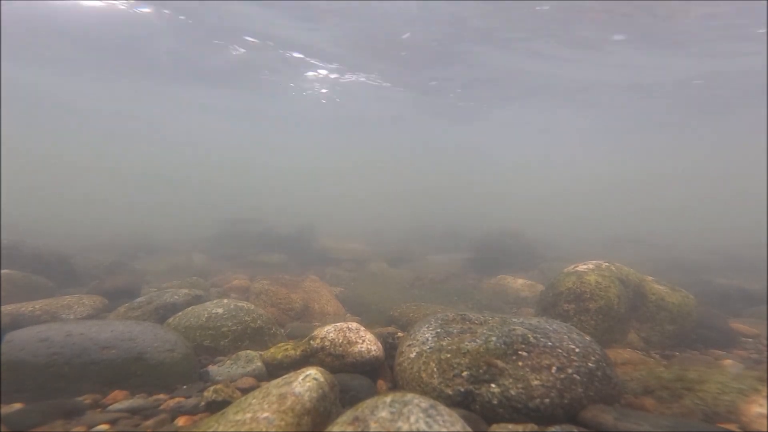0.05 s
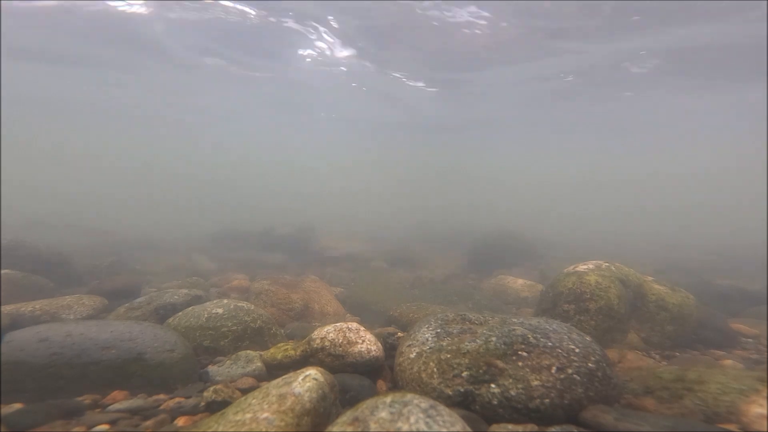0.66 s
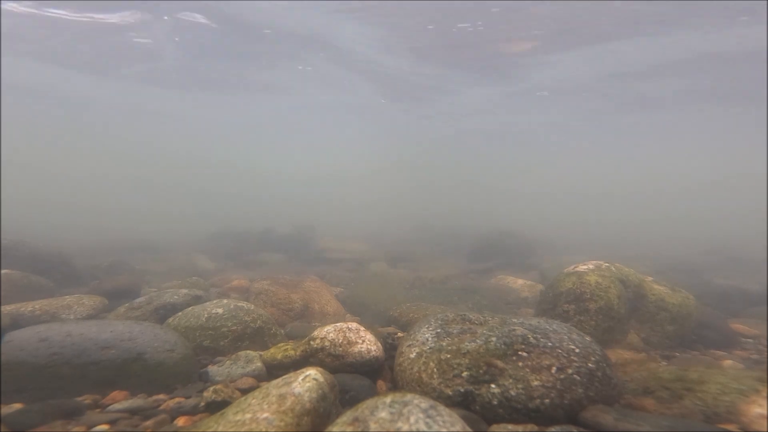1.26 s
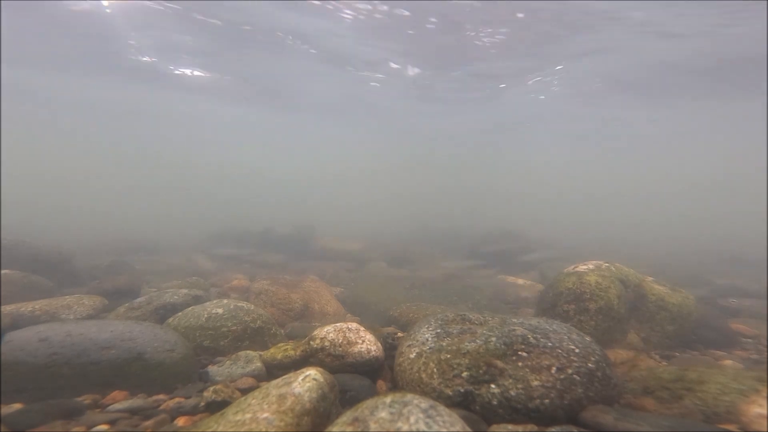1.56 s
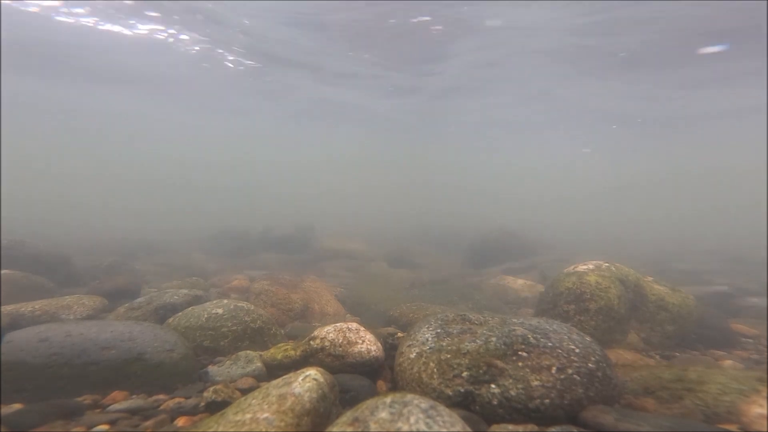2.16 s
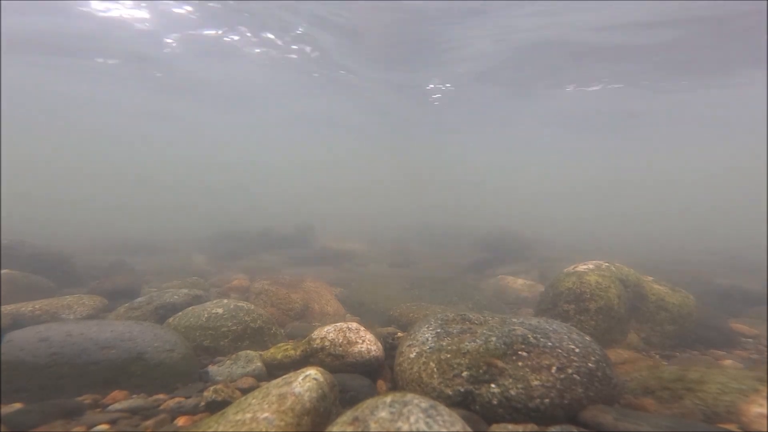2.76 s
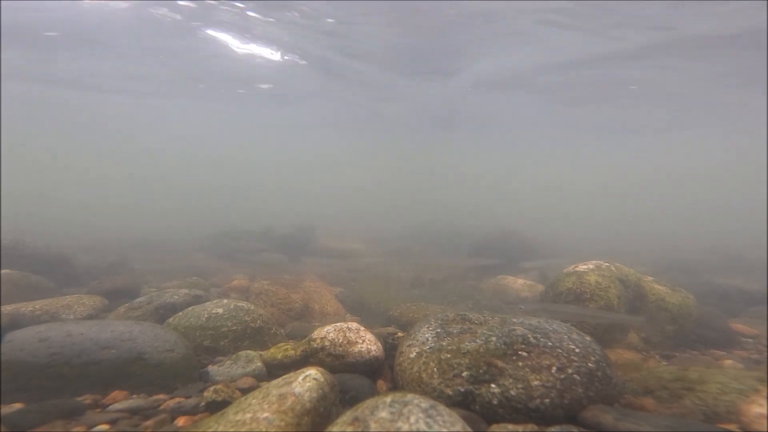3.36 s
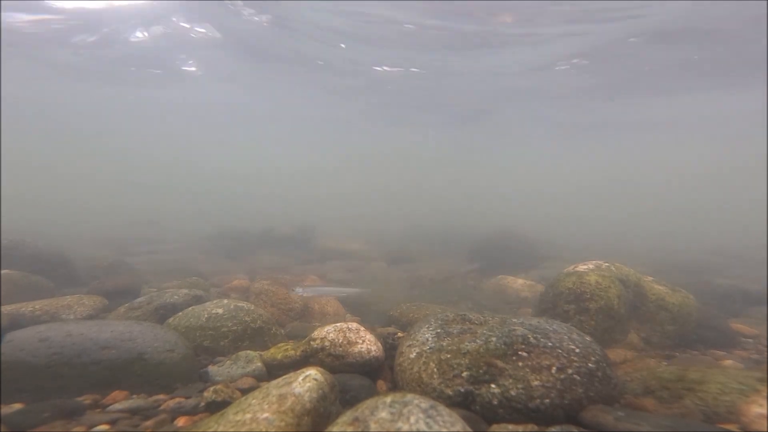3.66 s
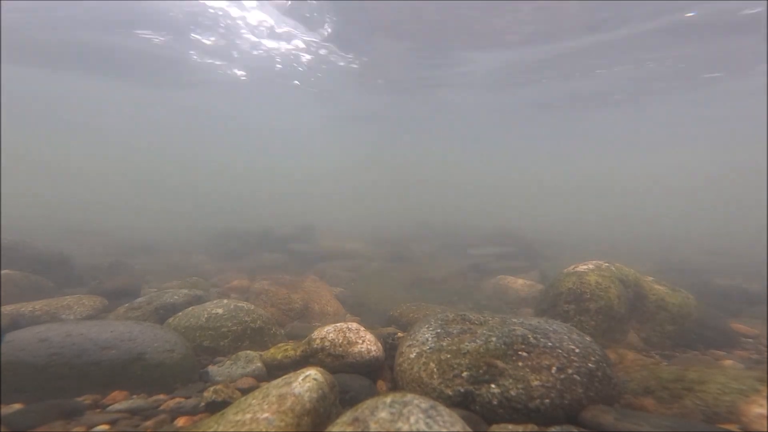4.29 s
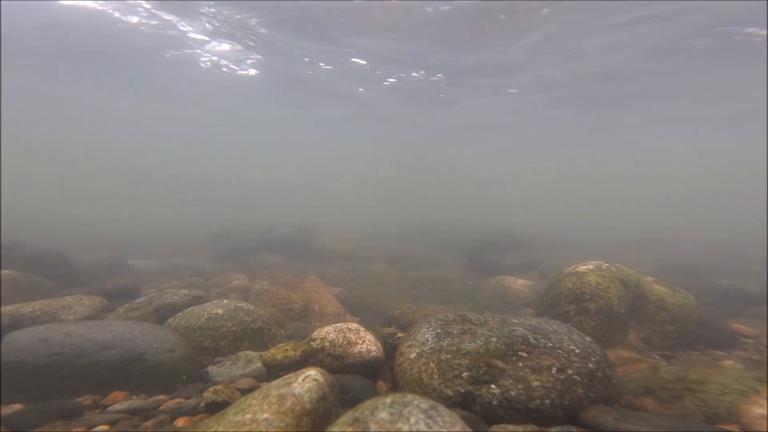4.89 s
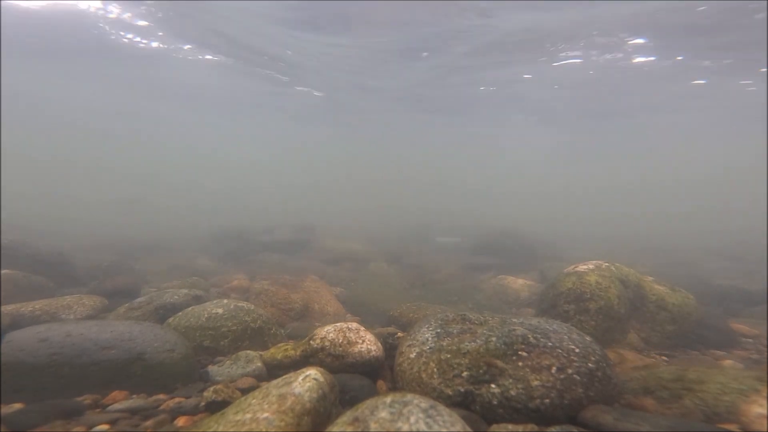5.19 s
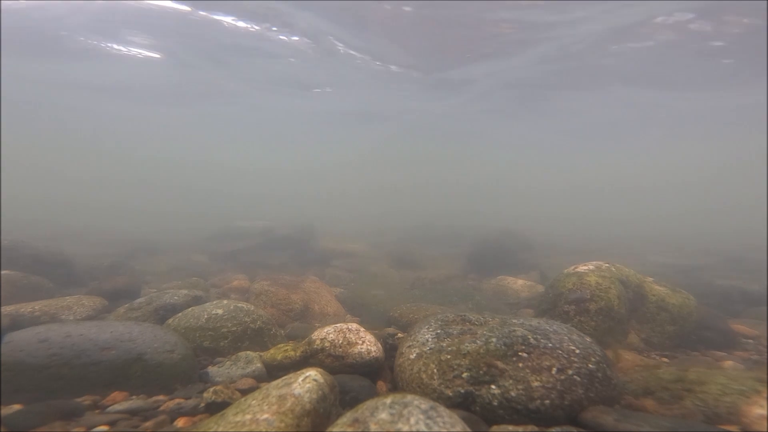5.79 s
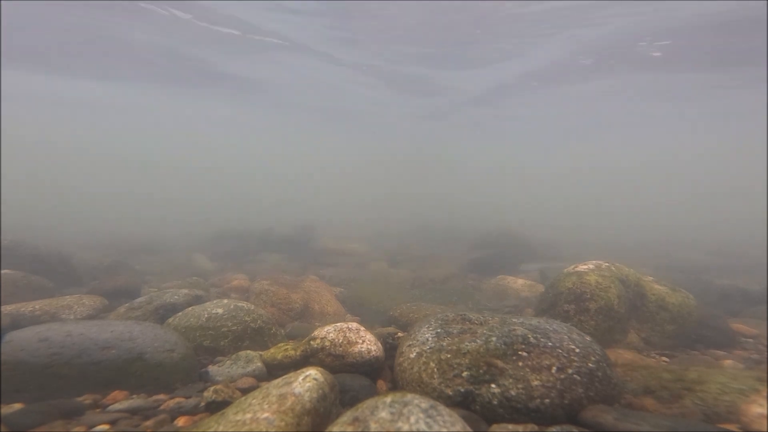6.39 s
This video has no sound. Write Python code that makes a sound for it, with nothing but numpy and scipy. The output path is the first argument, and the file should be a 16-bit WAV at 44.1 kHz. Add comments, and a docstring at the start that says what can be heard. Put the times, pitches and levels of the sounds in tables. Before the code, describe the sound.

A shallow, choppy river is heard through a microphone in a waterproof case resting among the stones. Small bubbles plop and tick in uneven spurts, and water knocks hollowly on the case over a steady low rumble. The bubbling is busiest in the first second and a half, eases in the middle, then returns with sharp plops just after four seconds and again near five.

```python
"""Choppy river from the riverbed

A shallow river heard from a waterproof camera case resting among the stones. Ripples fold air under,
and every bubble rings briefly at its own pitch. Slaps and ticks ring the case, eddies shake it into
a low rumble, and two microphones inside hear it through different paths."""
import sys
import numpy as np
from scipy import signal
from scipy.fft import rfft, irfft
from scipy.io import wavfile
from scipy.ndimage import uniform_filter1d

SR = 44100
rng = np.random.default_rng(int(sys.argv[2]) if len(sys.argv) > 2 else 0)


def wav_out(sig):
    """Save sig, one row per channel (or a flat mono array), as 16-bit PCM at SR to the path in sys.argv[1]."""
    wavfile.write(sys.argv[1], SR, np.round(np.clip(np.atleast_2d(sig).T, -1, 1) * 32767).astype(np.int16))


N = 284004

# Level rides. Each row: time in seconds, relative level in dB.
BUBBLING_RIDE = [(0.0, -58), (0.14, -57), (0.54, -54.5), (1.12, -53), (1.28, -59.5), (1.6, -52),
                 (2.01, -61), (2.3, -60.5), (2.48, -54), (2.71, -64), (3.43, -61), (3.68, -59), (4.24, -59),
                 (4.33, -55), (4.478, -61), (4.92, -55.5), (5.401, -60), (6.03, -60), (6.44, -64.5)]  # air folded under by ripples
SPRAY_RIDE = [(0.0, -69.5), (0.86, -69.5), (1.07, -62.5), (1.2, -71), (2.39, -73.5), (3.1, -78),
              (4.05, -65), (4.41, -77), (4.79, -66), (5.27, -72.5), (5.7, -69), (6.44, -78.5)]  # fine spray on the surface
CHURN_RIDE = [(0.0, -58), (0.14, -66.5), (0.54, -41.5), (0.72, -55), (1.33, -57.5), (1.58, -45.5),
              (1.81, -66), (2.06, -63), (2.55, -52.5), (3.05, -57), (3.28, -68.5), (4.16, -55.5),
              (4.27, -46), (4.54, -60.5), (4.98, -52.5), (5.35, -62), (5.8, -71.5), (6.06, -61),
              (6.44, -59)]  # water churning at the case
EDDY_RIDE = [(0.0, -48), (0.12, -61.5), (0.57, -39.5), (0.73, -49), (1.45, -47), (1.5, -68), (1.68, -38.5),
             (1.96, -63), (2.1, -39.5), (2.17, -59), (2.24, -43.5), (2.33, -60), (2.76, -43), (2.8, -52.5),
             (3.78, -59), (3.96, -46), (4.7, -61.5), (5.16, -49.5), (5.31, -64), (5.49, -45), (5.81, -65),
             (6.44, -42.5)]  # eddies of the current

# Tone curves. Each row: frequency in Hz, relative gain in dB.
BUBBLE_EQ = [(800, 0), (1100, -4.5), (1600, -1.5), (2250, 9.5), (2900, 0), (3800, 10), (4800, 9.5),
             (5800, -8.5)]  # small bubbles through the case
PING_EQ = [(6400, -4), (8000, 5.5), (9500, -0.5), (11000, -10.5), (13500, -11)]  # pings of spray
CRACKLE_EQ = [(300, 2.5), (1100, 0.5), (1650, -3), (2300, 0), (3200, -7.5), (4600, 3), (6200, -3),
              (8000, -5), (10500, -24), (15000, -21)]  # bursting foam
GULP_EQ = [(270, -6), (330, -14), (400, 7.5), (490, -28), (600, 4.5), (700, -46)]  # small gulps through the case
WASH_EQ = [(100, -22), (180, -5), (265, 14), (500, -14), (750, -13), (1100, 0), (1600, -21), (2250, 3.5),
           (3000, -10.5), (4600, -2), (6300, -38), (15000, -59)]  # wash of the far river
DISTANT_EQ = [(500, 1), (1700, -9.5), (4800, -4.5), (7000, -13), (15000, -25.5)]  # the most distant bubbling

# The loudest close bubbles. Each row: start in seconds, pitch in Hz, level in dB.
NEAR_BUBBLES = [(0.0767, 11500, -29), (0.079, 4170, -25), (0.1134, 2154, -15.5), (0.162, 3680, -15),
                (0.2499, 8500, -21), (0.286, 5550, -32), (0.343, 3850, -32), (0.3636, 2630, -27.5),
                (0.3773, 2190, -21), (0.4267, 2090, -8), (0.478, 1400, -19), (0.515, 2310, -23.5),
                (0.6507, 2350, -27.5), (0.832, 4550, -33.5), (0.9855, 2130, -17), (1.0258, 2590, -21),
                (1.044, 7900, -23), (1.0481, 1950, -15), (1.0846, 3970, -27.5), (1.123, 2850, -25),
                (1.1375, 2550, -22.5), (1.341, 2670, -24), (1.361, 3630, -35.5), (1.4097, 4520, -18.5),
                (1.55, 7730, -30), (1.564, 2326, -29), (1.6279, 2310, -30), (1.6828, 3100, -28.5),
                (2.2901, 4060, -29), (2.5085, 2546, -23), (2.537, 2334, -30.5), (2.553, 3620, -31),
                (2.6838, 3510, -30), (2.792, 2230, -29), (3.019, 1377, -32), (3.142, 2016, -35),
                (3.2236, 3660, -34.5), (3.3434, 2200, -36.5), (3.696, 3850, -35), (3.8988, 3360, -30),
                (4.1569, 4630, -12), (4.2753, 2670, -18.5), (4.2812, 2464, -9), (4.2995, 2094, -16),
                (4.313, 2700, -32), (4.3333, 2380, -25), (4.7587, 7980, -24), (4.894, 2276, -13.5),
                (4.93, 2330, -29.5), (5.302, 2260, -34), (5.317, 4450, -35.5), (5.983, 4200, -31.5),
                (6.0426, 4500, -29.5)]
# Water slapping the case. Each row: start in seconds, relative level in dB, pitch in Hz,
# cycles to fade by about 33 dB.
SLAP_HITS = [(0.11, -32.5, 378, 20.5), (0.112, -26, 1130, 12.5), (0.4243, -25, 420, 10),
             (0.4737, -18, 537, 10.9), (0.5445, -22.5, 540, 8.1), (0.832, -40, 613, 29),
             (1.027, -34.5, 290, 7.2), (1.408, -32.5, 290, 7.6), (1.448, -38, 600, 33),
             (1.494, -35.5, 587, 17), (2.031, -29, 268, 14.7), (2.046, -43, 385, 22),
             (2.374, -34.5, 566, 15.5), (2.406, -37, 610, 24), (2.535, -35.5, 587, 17),
             (2.594, -35, 560, 12.2), (2.633, -34.5, 578, 15), (3.047, -39, 466, 11.3),
             (3.249, -36, 567, 18), (3.271, -32, 600, 22), (4.029, -30.5, 700, 11.6),
             (4.28, -30.5, 1150, 11), (5.4745, -38, 393, 23), (5.477, -31.5, 271, 15.4),
             (5.723, -39, 607, 16), (5.83, -37.5, 600, 17)]
# Air pockets snapping shut at the case. Each row: start in seconds, relative level in dB, pitch in Hz.
SNAP_HITS = [(0.1142, -9.5, 1570), (0.4278, -27, 2400), (0.4745, -29, 1070), (0.5455, -34, 940),
             (1.0275, -19, 2300), (2.431, -28, 4130), (3.058, -37.5, 920), (4.03, -49, 1080),
             (4.153, -24, 2200), (4.1567, -12.5, 2170), (4.2814, -15, 1400), (4.9032, -11, 1330)]
# Rising bubbles. Each row: start in seconds, mid-glide pitch in Hz, level in dB.
RISING_BUBBLES = [(0.555, 982, -39), (0.585, 2220, -36), (2.698, 1040, -41), (4.396, 1047, -38.5),
                  (4.989, 2200, -29.5)]
# Splashes that drag air under. Each row: start in seconds, level in dB.
SPLASH_CLOUDS = [(1.03, -43.5), (1.59, -43), (4.29, -36.5), (4.89, -44.5)]

# Resonances. Each row: pitch in Hz, seconds to fade by 60 dB, relative level in dB.
CASE_MODES = [(264.5, 0.41, -10.5), (311, 0.16, -16.5), (398.7, 0.13, -8.5), (507, 0.018, 5),
              (600, 0.05, 2), (1063, 0.052, -9.5), (1150, 0.012, 11), (1400, 0.15, -7)]  # the body of the case
PANEL_MODES = [(2200, 0.046, -5.5), (2455, 0.18, -6.5), (2723, 0.075, -4)]  # its thin panels
# Paths to the two microphones. Each row: frequency in Hz, left minus right in dB, left lead in radians.
MIC_PATHS = [(600, 0.8, -0.0), (1000, 1.2, -0.5), (1200, -3.6, -1.1), (1380, -5.7, -3.1), (1900, 1.4, -3.0),
             (2100, -4.1, -3.5), (2350, -3.3, -5.5), (3000, -0.4, -5.6), (3400, -4.9, -7.1),
             (4200, -7.2, -6.8), (4800, 2.4, -5.6), (5700, -5.1, -5.4), (6400, 1.5, -4.6),
             (8200, -16.1, -13.4), (9800, -0.0, -19.8), (13000, -10.7, -19.8)]


def undb(db):
    """Decibels to gain."""
    return 10 ** (np.asarray(db) / 20)


def unit(x):
    """Scale to rms 1."""
    return x / np.sqrt(np.mean(x ** 2))


def on_log(hz, table, column=1):
    """Read a table column on a log-frequency axis."""
    table = np.array(table)
    return np.interp(np.log(np.maximum(hz, 1)), np.log(table[:, 0]), table[:, column])


def eq(x, curve):
    """Shape the tone with (Hz, dB) points."""
    return irfft(rfft(x) * undb(on_log(np.fft.rfftfreq(N, 1 / SR), curve)), N)


def wander(per_s):
    """Smooth random movement with rms 1."""
    hold = max(int(SR / per_s), 2)
    steps = np.repeat(rng.standard_normal(N // hold + 1), hold)
    return unit(uniform_filter1d(steps, hold)[:N])


def add(track, start_s, sound):
    """Drop a sound onto a track."""
    i = int(np.clip(start_s * SR, 0, N - 1))
    track[i:i + len(sound)] += sound[:N - i]


def ring(hz, t60, sag=0., sag_s=0.0025, rise_cycles=.35):
    """A damped tone that glides down through hz, by the share sag in all; negative sag climbs."""
    t = np.arange(int(np.clip(t60, .002, .4) * SR)) / SR
    pitch = hz * (1 + sag * (np.exp(-t / sag_s) - .5))
    attack = (1 - np.exp(-t * hz / rise_cycles)) ** 2
    return np.sin(2 * np.pi * np.cumsum(pitch) / SR) * np.exp(-np.log(1000) * t / t60) * attack


def flutter():
    """Turbulence deforms ringing bubbles: a fast, uneven gain with rms 1."""
    return unit(undb(1.8 * wander(per_s=650)))


def swarm(spurts, per_s, band_hz, cycles, spread, curve, sag, rise_s, soften):
    """Random bubbles born in spurts, each with a click; soften tames the loudest. Rms 1."""
    out = np.zeros(N)
    low_hz, high_hz = band_hz
    born = np.cumsum(spurts)
    for when, size, strength, damping, drift in rng.random((int(per_s * N / SR), 5)):
        hz = low_hz * (high_hz / low_hz) ** size
        db = -spread * np.log(strength + soften) + on_log(hz, curve)
        start = np.searchsorted(born, when * born[-1]) / SR
        t60 = cycles * 2 ** (2 * damping - 1) / hz
        add(out, start, undb(db) * ring(hz, t60, sag * (drift - .3), t60 * 0.33, hz * rise_s))
        add(out, start, undb([db - 13]))  # the click
    return unit(out)


def ticks(spurts, per_s, spread):
    """Sharp, uneven pressure pulses from bursting bubbles; rms 1."""
    when, strength = rng.random((2, N))
    fires = when < per_s / SR * spurts / spurts.mean()
    return unit(fires * undb(-spread * np.log(strength + .04)) * rng.choice([-1, 1], N))


def small_bubbles(spurts, bubble_db, spray_db):
    """Air folded under rings as short, rough plops; spray adds tiny pings."""
    births = spurts * undb(.4 * (bubble_db - bubble_db.mean()))  # churned water folds in more bubbles
    plops = swarm(births, per_s=260, band_hz=(903, 5466), cycles=30, spread=4.87,
                  curve=BUBBLE_EQ, sag=0.015, rise_s=0.0002, soften=0.07)
    pings = swarm(spurts, per_s=190, band_hz=(6200, 13500), cycles=30, spread=6.4,
                  curve=PING_EQ, sag=0.08, rise_s=0.0002, soften=0.022)
    return (plops * flutter() * undb(bubble_db + 2) + pings * undb(spray_db + 7)) * flutter()


def foam(spurts, spray_db, puff_s=0.00062):
    """Foam crackles, each burst its own short puff of noise."""
    bursts = np.abs(ticks(spurts, per_s=140, spread=7.9))
    envelope = signal.lfilter([1], [1, -np.exp(-1 / (puff_s * SR))], bursts)
    return unit(eq(envelope * rng.standard_normal(N), CRACKLE_EQ)) * undb(spray_db + 7)


def churning(spurts, churn_db):
    """Soft, overlapping gulps and a patter of knocks that ring the case."""
    gulps = swarm(spurts, per_s=60, band_hz=(243.5, 756), cycles=9.1, spread=3.7,
                  curve=GULP_EQ, sag=-0.045, rise_s=0.0005, soften=0.13)
    patter = unit(case(ticks(spurts, per_s=110, spread=12)))
    return gulps * undb(churn_db - 4.5) + patter * undb(churn_db - 2)


def case(push):
    """The case rings with the same modes for every push."""
    response = np.zeros(SR // 2)
    for hz, t60, db in CASE_MODES:
        mode = undb(db) * ring(hz, t60, rise_cycles=0.14)
        response[:len(mode)] += mode
    return signal.fftconvolve(push, response / np.linalg.norm(response))[:N]


def far_river(bubble_db, spray_db, follow=0.35):
    """A flickering wash through the case and wide, distant bubbling; both follow the close swells."""
    wash_db, hiss_db = (follow * (db - db.mean()) for db in (bubble_db, spray_db))
    flicker = wander(per_s=14)
    wash = unit(eq(rng.standard_normal(N), WASH_EQ)) * undb(wash_db - 60 + 3.36 * flicker)
    distant = unit(eq(rng.standard_normal((2, N)), DISTANT_EQ)) * undb(hiss_db - 63 + 1.5 * flicker)
    return microphones(wash) + distant


def rumble(eddy_db, hz=62, width_hz=13):
    """Eddies shake the case on its mount, and slower swells press on it."""
    shake = signal.lfilter(*signal.iirpeak(hz, hz / width_hz, fs=SR), rng.standard_normal(N))
    shake = eq(shake, [(30, -0.5), (60, 1), (120, -5.5), (200, -9), (500, -5.5)])
    shake /= np.sqrt(uniform_filter1d(shake ** 2, SR // 6))  # the flow alone sets its slow swells
    sway = eq(rng.standard_normal(N), [(6, 1.5), (15, -23), (28, 7.5), (45, -18), (70, -48), (300, -80)])
    sway_db = -62 + 0.063 * (eddy_db - eddy_db.mean()) + 3.6 * wander(per_s=3.1)
    return shake * undb(eddy_db + 2.5) + unit(sway) * undb(sway_db)


def near_bubbles(buoyant_hz=1650, shed_count=8, shed_s=0.028):
    """Each bubble pinches off, jolts the case and sheds weaker ones of about its own size."""
    out, jolts = np.zeros((2, N))
    for start, hz, db in NEAR_BUBBLES:
        chance = rng.random((1 + shed_count, 3))
        # low bubbles ring longer; violent ones break up sooner, twice as fast for every 21 dB
        t60 = 56.5 / hz * 2 ** ((-17 - db) / 21)
        # small bubbles are dragged under and fall in pitch; large ones near the surface and rise
        sag = 0.176 * (1 - (buoyant_hz / hz) ** 2) * chance[0, 0]
        add(out, start, undb(db) * ring(hz, t60, sag, t60 * 0.39, rise_cycles=hz / 5000))
        add(jolts, start, undb(db - 4) * (.5 + chance[0, 1:2]))
        for when, size, strength in chance[1:]:
            late = -np.log(when + 0.0416)
            shed_hz = hz * (1 + 0.11 * (2 * size - .8))
            piece = ring(shed_hz, 18 * (1 + 2 * strength) / hz, sag, rise_cycles=0.16)
            add(out, start + shed_s * late, undb(db - 15 - 18 * late - 1.4 * strength) * piece)
    return out * np.sqrt(flutter()) + case(jolts)


def slaps(settle_s=0.019):
    """Large air pockets gulp for a few cycles, knock the case and rattle it as they break up."""
    gulps, knocks, cracks = np.zeros((3, N))
    t = np.arange(SR // 6) / SR
    for start, db, hz, cycles in SLAP_HITS:
        add(gulps, start + 0.00209, undb(db + 2) * ring(hz, 1.84 * cycles / hz, rise_cycles=1))
        rattle = rng.standard_normal(len(t)) ** 5 * np.exp(-t / settle_s)
        blows = (t == 0) + undb(-7) * rattle / np.linalg.norm(rattle)
        blows *= undb(db) * min(10 / cycles, 1) ** 2  # pockets that ring freely hardly touch the case
        push = ring(hz, 3 / hz, rise_cycles=0.17)  # a big, slow pocket wakes the low modes
        add(knocks, start + 0.00203, undb(11) * signal.fftconvolve(blows, push / np.abs(push).sum()))
        add(cracks, start + 0.001405, undb(-2) * blows)
    return gulps + case(knocks) + eq(cracks, [(300, 31), (1300, 33.5), (2600, 21.5), (5000, -22)])


def snaps(cycles=7, rebound_s=0.00236, rebound_db=-8):
    """An air pocket collapses in a few cycles and rebounds once."""
    out = np.zeros(N)
    for start, db, hz in SNAP_HITS:
        snap = undb(db + 3) * ring(hz, cycles / hz, rise_cycles=0.22)
        add(out, start, snap)
        add(out, start + rebound_s, undb(rebound_db) * snap)
    return out


def gurgles(fade_cycles=130, climb_hz=280, climb_s=0.0292, wobble_db=3):
    """A rising bubble swells, wobbles and climbs in pitch as it nears the surface."""
    out = np.zeros(N)
    for start, hz, db in RISING_BUBBLES:
        tone = ring(hz, fade_cycles / hz, -climb_hz / hz, climb_s, rise_cycles=14)
        add(out, start, undb(db) * tone / np.abs(tone).max())
    return out * flutter() * unit(undb(wobble_db * wander(per_s=120)))


def sputter(spurts, t, fade_s=0.091):
    """Each splash leaves a cloud of air that sputters away as crowded, short bubbles."""
    cloud = sum(undb(db) * np.exp(-np.abs(t - start) / fade_s) * (t > start)
                for start, db in SPLASH_CLOUDS)
    return cloud * swarm(spurts, per_s=400, band_hz=(1100, 3600), cycles=17, spread=2,
                         curve=BUBBLE_EQ, sag=0, rise_s=0.00028, soften=.05)


def panels(x):
    """Thin panels take up sound near their own pitches and let it go slowly."""
    return sum(undb(db) * signal.lfilter(*signal.iirpeak(hz, np.pi * hz * t60 / np.log(1000), fs=SR), x)
               for hz, t60, db in PANEL_MODES)


def microphones(x):
    """The case walls carry the treble to each microphone with its own strength and delay."""
    hz = np.fft.rfftfreq(N, 1 / SR)
    width = np.minimum(hz / MIC_PATHS[0][0], 1) ** 2  # the bass stays centred
    balance = undb(on_log(hz, MIC_PATHS) * width)
    lead = np.exp(1j * on_log(hz, MIC_PATHS, column=2) * width)
    right = rfft(x) * np.sqrt(2 / (1 + balance ** 2))
    return irfft(np.array([right * balance * lead, right]), N)


def stones(x, db=-10, t60=0.027):
    """Stones and surface scatter the treble back within milliseconds, differently on each side."""
    t = np.arange(SR // 12) / SR
    scatter = rng.standard_normal((2, len(t))) * np.exp(-np.log(1000) * t / t60) * (t > .001)
    scatter /= np.linalg.norm(scatter, axis=1, keepdims=True)
    treble = signal.sosfilt(signal.butter(3, [1150, 9000], "band", fs=SR, output="sos"), x)
    return undb(db) * signal.fftconvolve(treble[None], scatter, axes=1)[:, :N]


def scene():
    """Bubbles near and far, ticks and slaps on the case, all over the rumble of the current."""
    t = np.arange(N) / SR
    rides = (BUBBLING_RIDE, SPRAY_RIDE, CHURN_RIDE, EDDY_RIDE)
    bubble_db, spray_db, churn_db, eddy_db = (np.interp(t, *np.transpose(ride)) for ride in rides)
    spurts = undb(3.5 * wander(per_s=18))  # ripples break in spurts that set off bubbles
    small = small_bubbles(spurts, bubble_db, spray_db) + foam(spurts, spray_db)
    large = near_bubbles() + gurgles() + slaps() + snaps()
    large += sputter(spurts, t) + churning(spurts, churn_db)
    small += panels(small)
    large += panels(large)
    pan = undb(np.array([[1], [-1]]) * 5.27 * wander(per_s=60))  # small bubbles come from all sides
    close = microphones(large) + microphones(small) * pan + stones(large + small)
    return close + far_river(bubble_db, spray_db) + rumble(eddy_db)


def record(dry, top_hz=15850):
    """A steep low-pass trims the very top."""
    return signal.sosfilt(signal.ellip(10, .2, 70, top_hz, fs=SR, output="sos"), dry)


dry = scene()
out = record(dry)
wav_out(out)
```